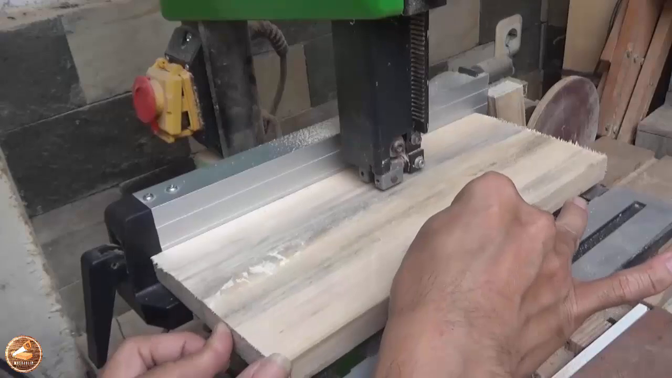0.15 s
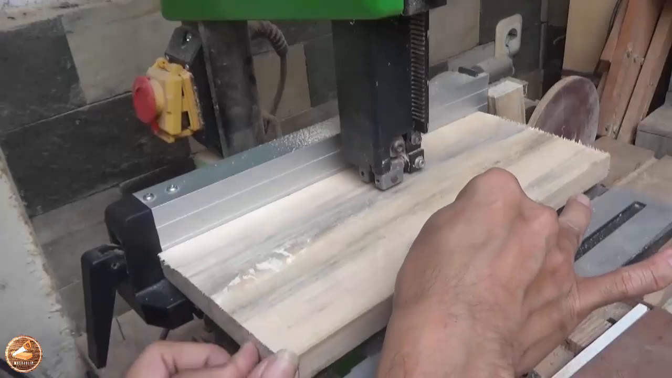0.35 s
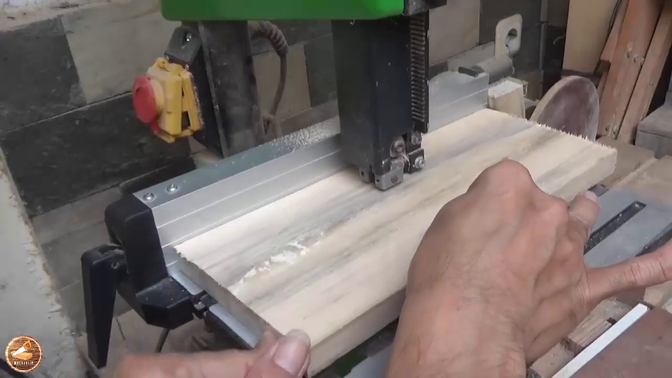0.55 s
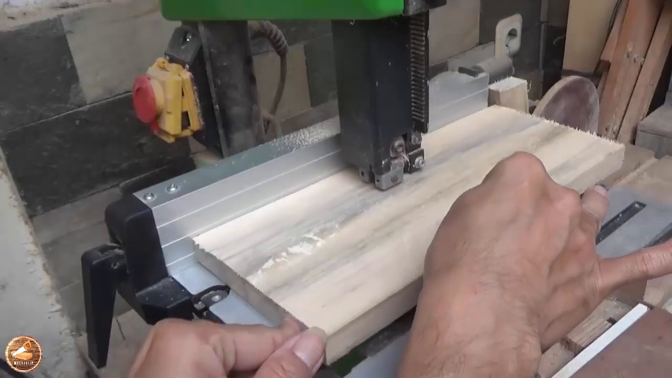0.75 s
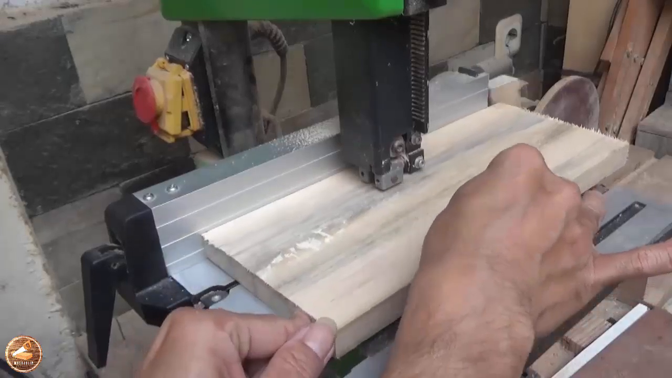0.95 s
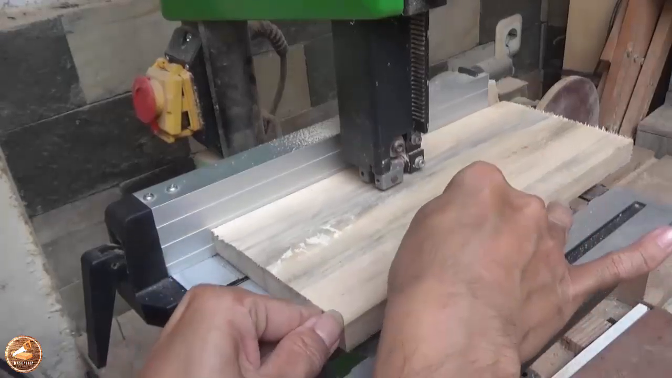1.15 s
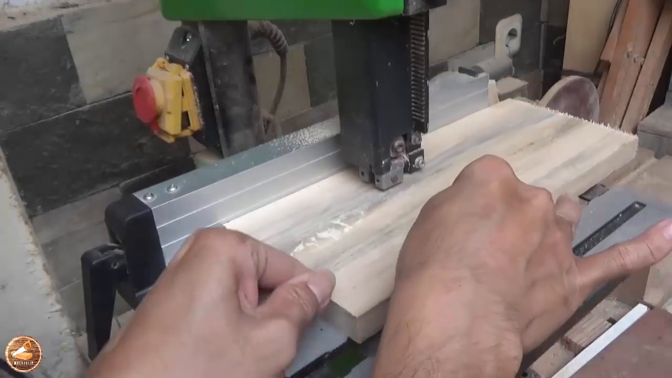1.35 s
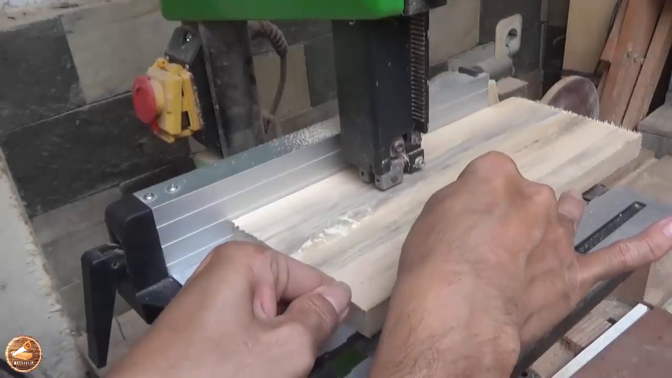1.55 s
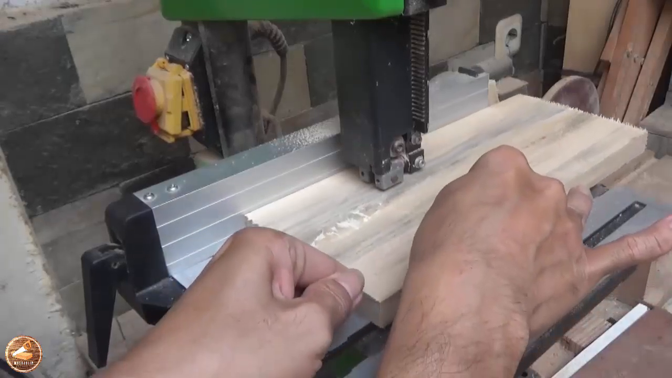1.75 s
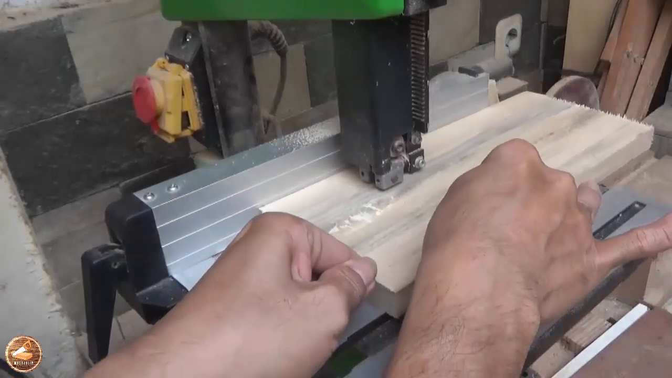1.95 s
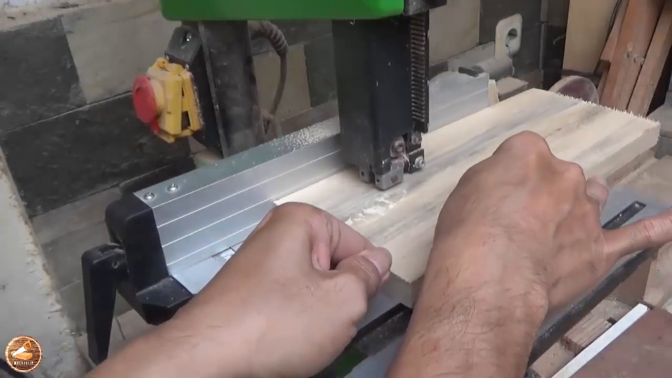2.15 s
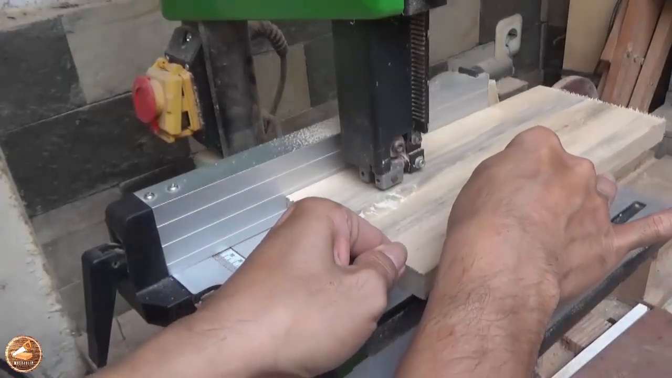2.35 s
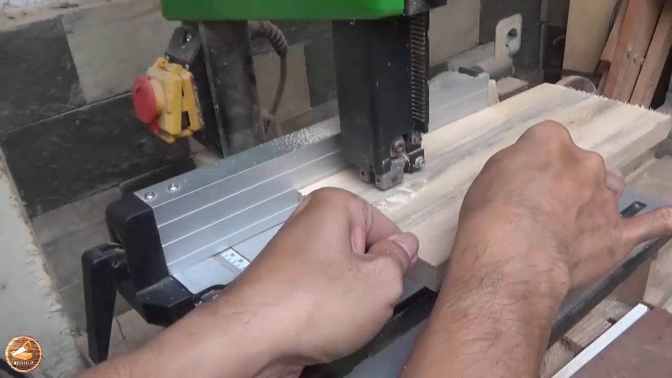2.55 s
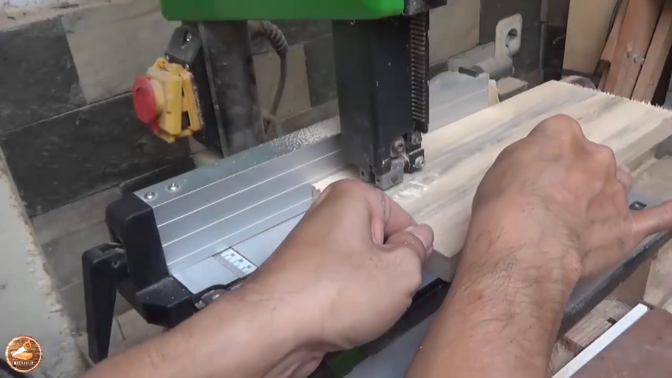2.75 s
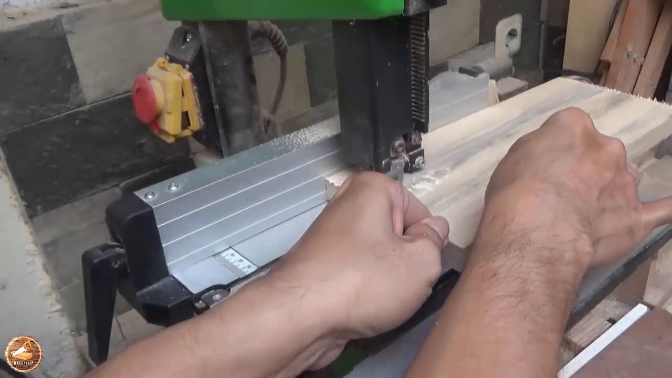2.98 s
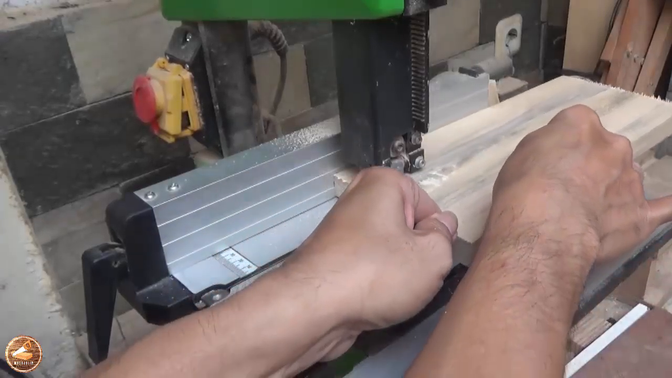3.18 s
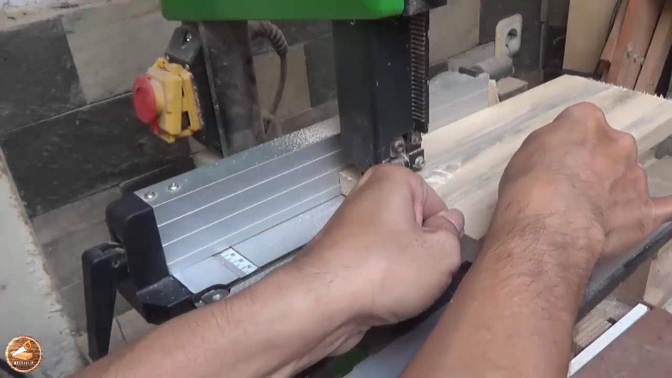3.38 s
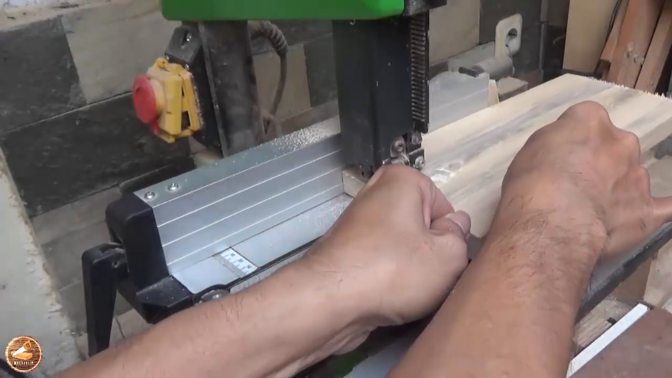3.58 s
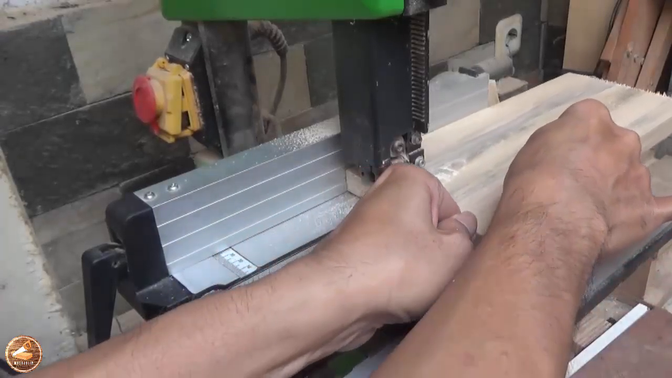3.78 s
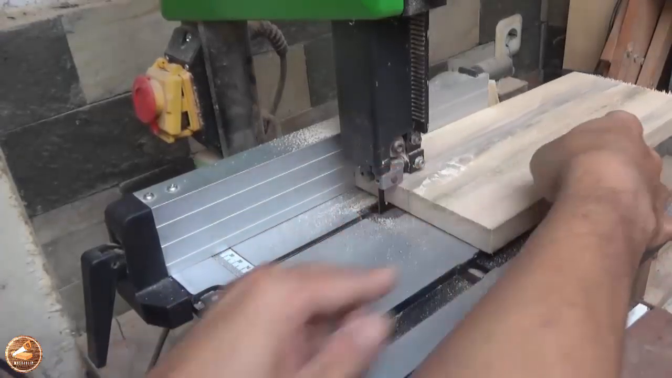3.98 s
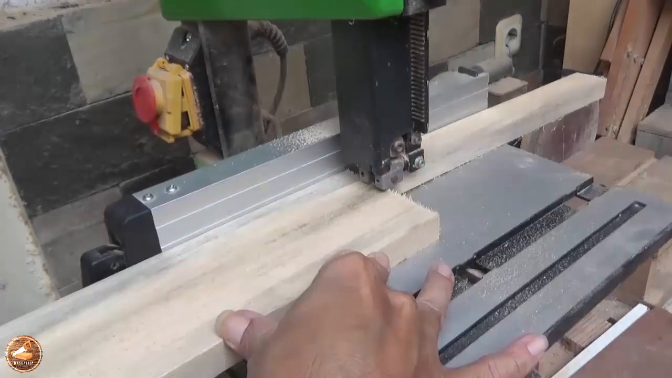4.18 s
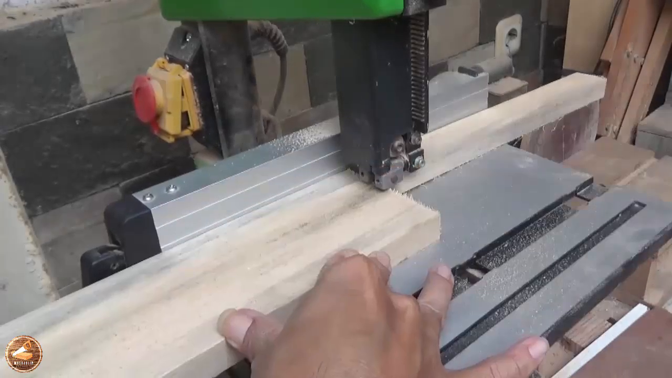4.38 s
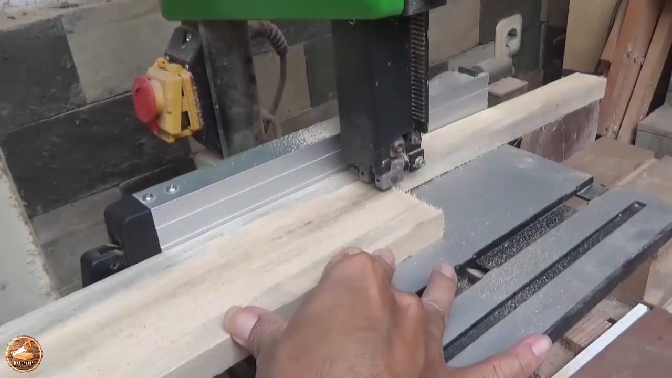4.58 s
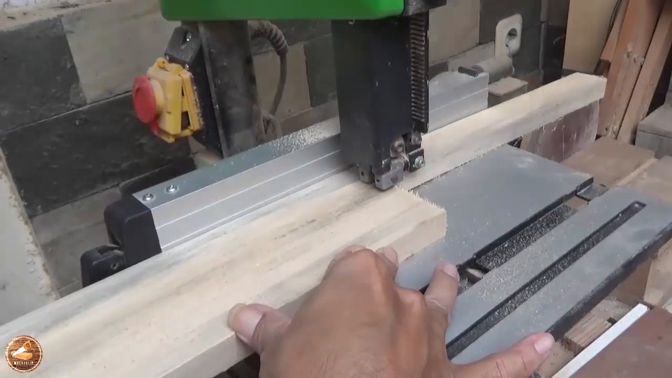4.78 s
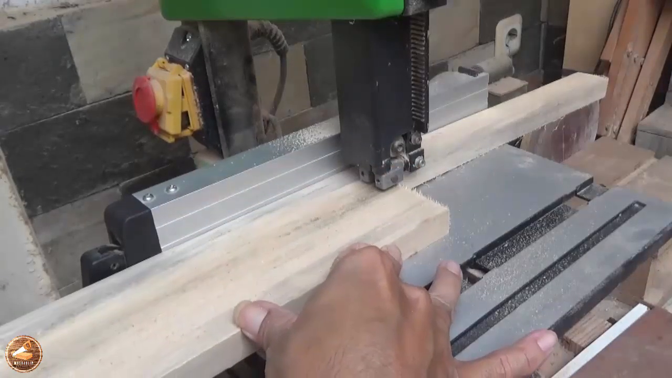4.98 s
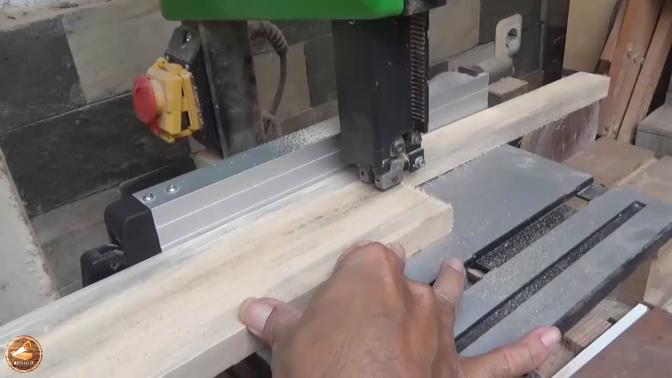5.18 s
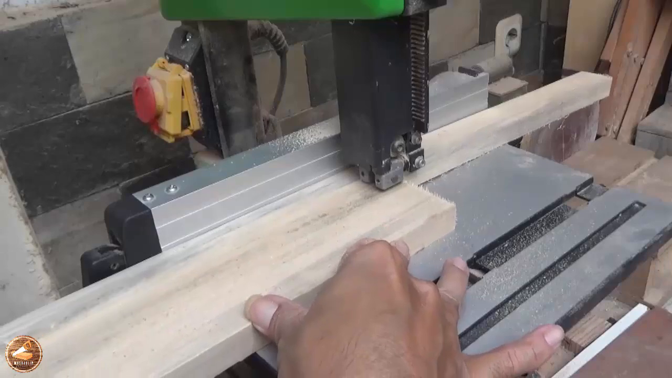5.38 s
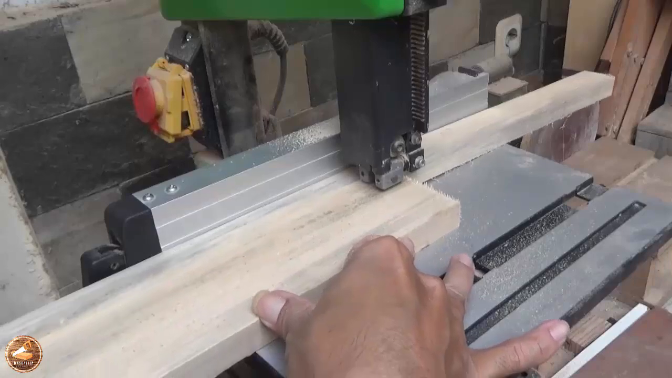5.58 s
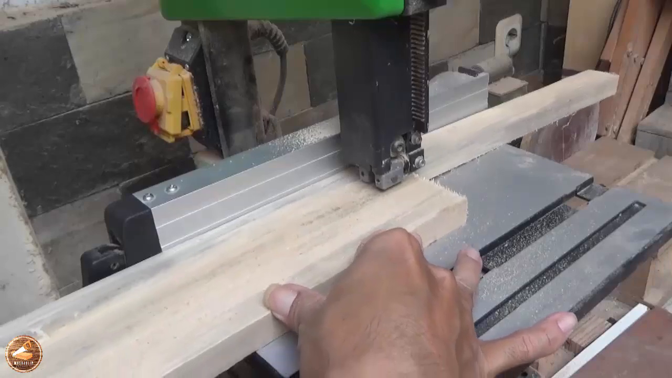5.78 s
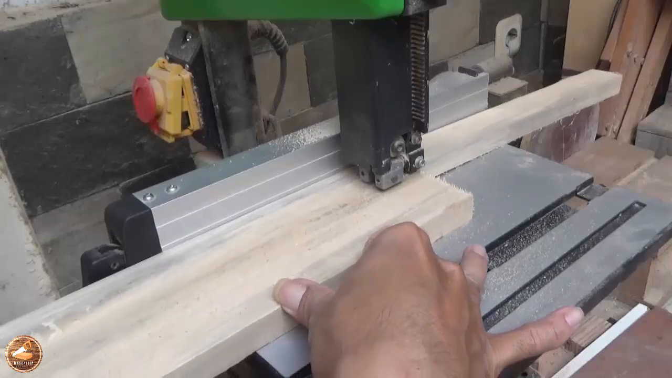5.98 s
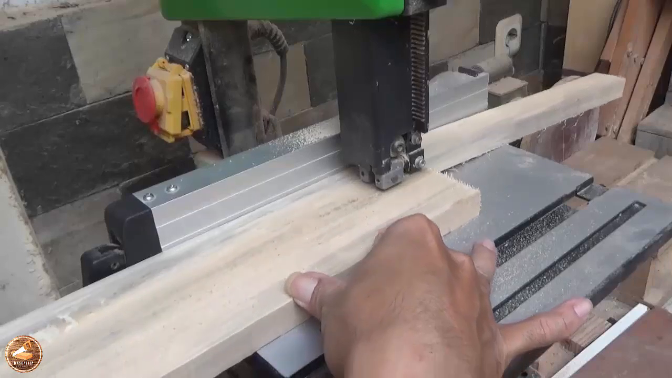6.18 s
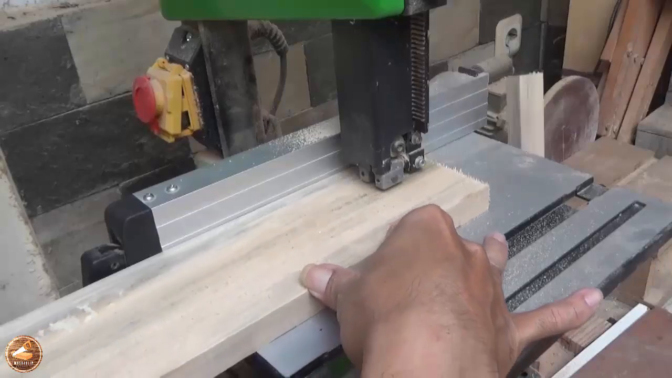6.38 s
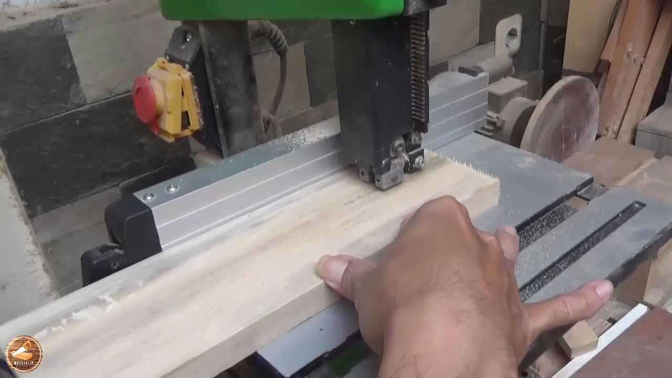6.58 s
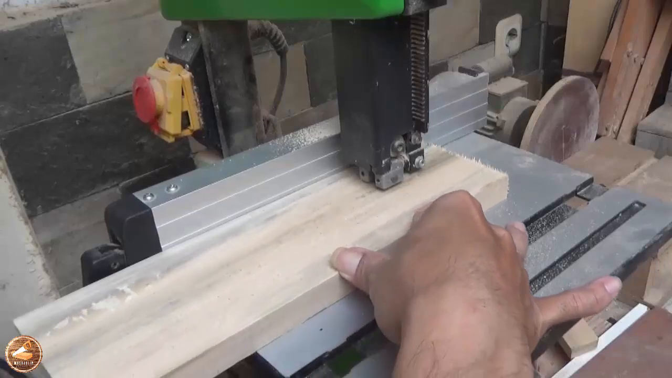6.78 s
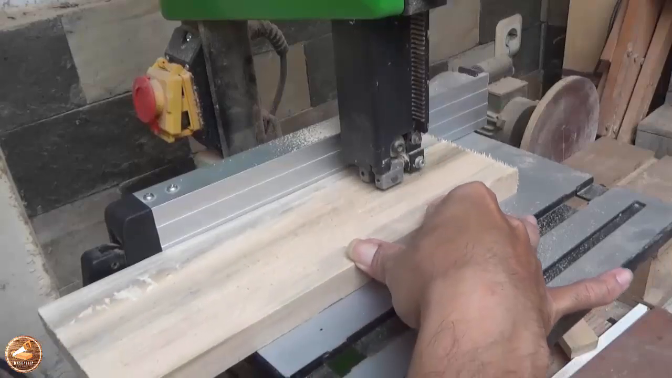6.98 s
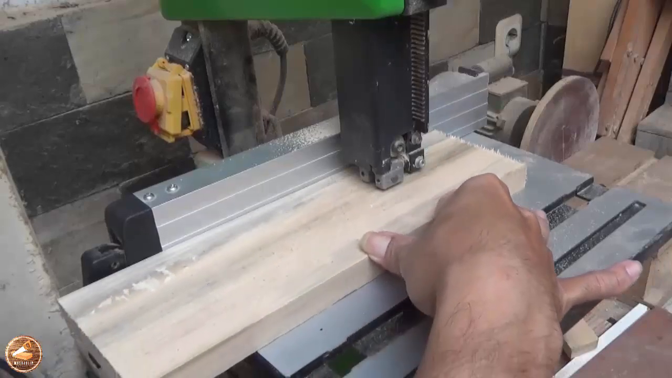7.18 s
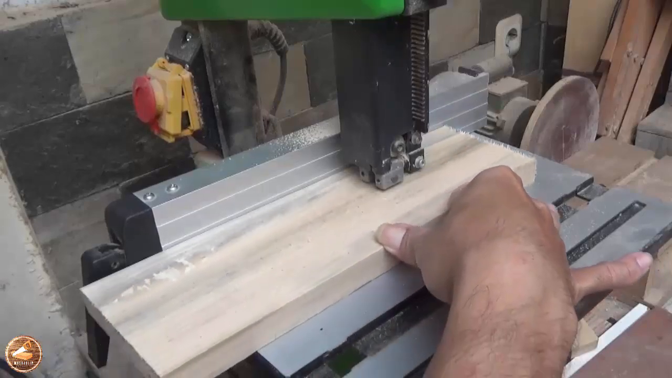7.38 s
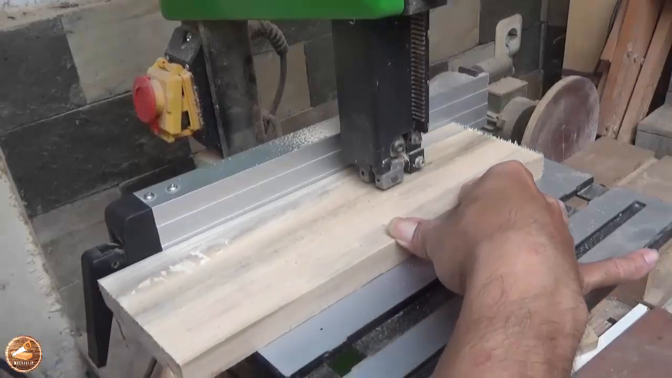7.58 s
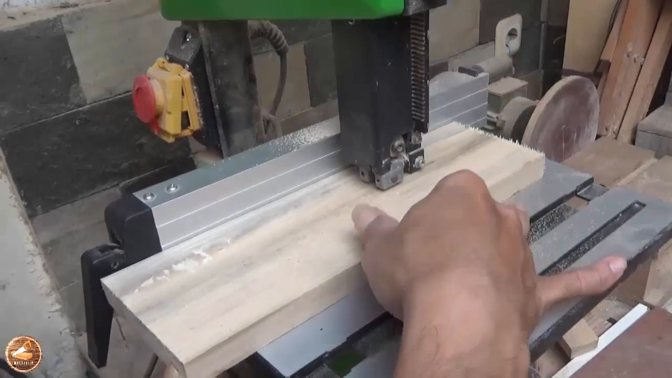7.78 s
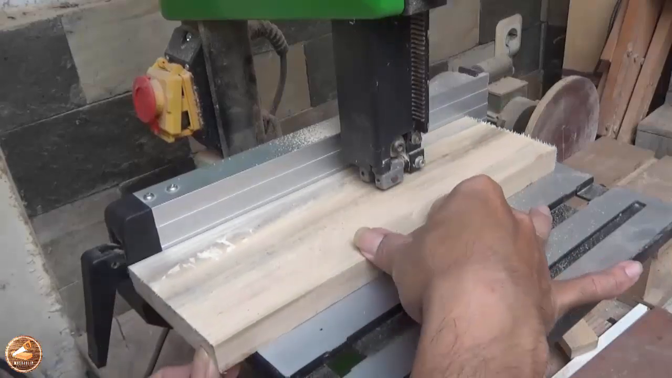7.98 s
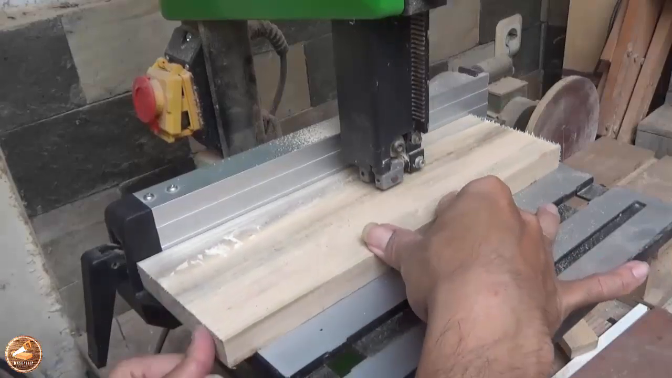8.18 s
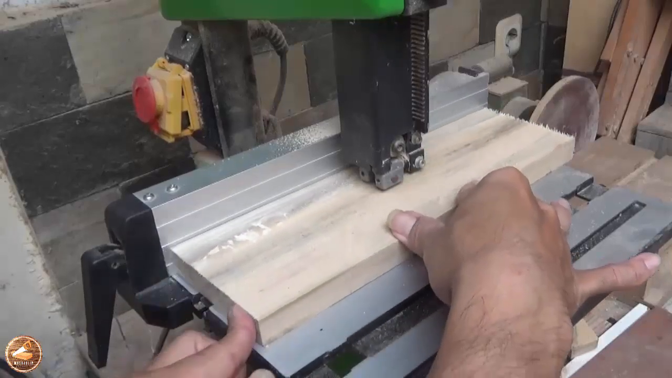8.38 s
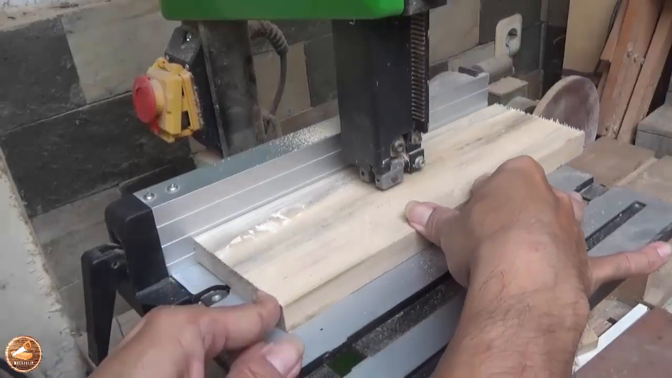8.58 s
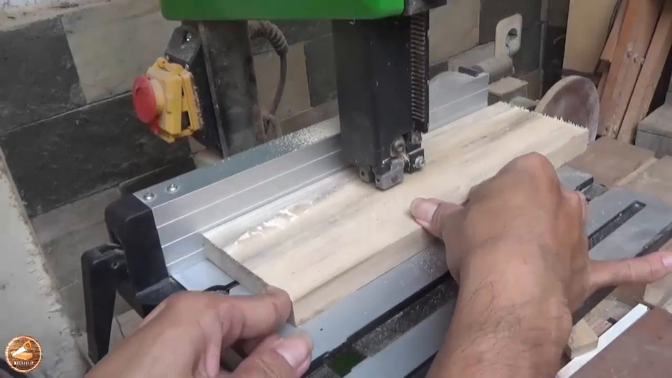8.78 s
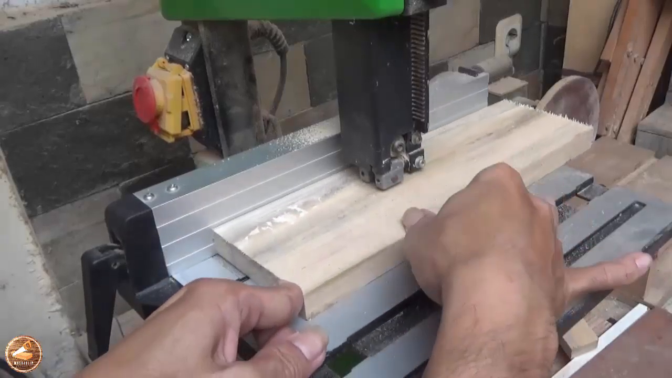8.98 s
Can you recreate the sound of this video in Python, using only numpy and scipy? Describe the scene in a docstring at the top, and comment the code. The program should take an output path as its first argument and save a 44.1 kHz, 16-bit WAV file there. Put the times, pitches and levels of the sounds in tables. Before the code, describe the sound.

A benchtop band saw is already cutting at 0 s, close up: a piercing, gritty whine around three kilohertz with higher overtones, chattering in very rapid chirps over dense, bright sawdust hiss and a faint frame drone. Brief dips come in the first quarter second, near 1 s and at 1.4 s as the hands let up, then the screech returns. From about 3.2 s the load lightens, the overtones thin and the pitch edges up; the cut ends near 3.9 s. For a third of a second the saw runs free, less hissy, with a hollow hum. At 4.2 s a second cut starts, higher, over four kilohertz, light at first, growing harsher after 5.5 s. At 6.3 s an offcut lands with a dry wooden crack and tiny bounces. Squealing continues, easing at 6.6, 7.7 and 8.1 s and surging back, still sawing at 9 s. Short workshop reflections.

```python
"""Workshop: a benchtop band saw rips two boards, running free for a moment between; the second cut sounds higher.
Tooth impacts whine as tone stacks; the loaded blade chatters in chirping bursts once per wheel turn.
Push on the board sets blade speed and chatter pitch. Sawdust hiss and frame drone are coloured noise;
blade whistles and frame hums are narrow noise and rough tones. One offcut drops, cracks and rings.
Low rumble lies below; short reflections differ between the ears."""
import sys
import numpy as np
from scipy import signal
from scipy.fft import rfft, irfft, next_fast_len
from scipy.io import wavfile
from scipy.ndimage import uniform_filter1d

SR = 44100
rng = np.random.default_rng(int(sys.argv[2]) if len(sys.argv) > 2 else 0)


def transcribe(signal):
    """Save signal, clipped to [-1, 1], as a 16-bit WAV file at the path in sys.argv[1]."""
    frames = np.atleast_2d(signal).T
    limited = np.clip(frames, -1, 1)
    pcm = np.round(limited * 32767).astype(np.int16)
    wavfile.write(sys.argv[1], SR, pcm)


def volts_from_decibels(level):
    """Turn decibel levels (scalar or array-like) into linear amplitude factors."""
    exponent = np.asarray(level, float) / 20
    return 10 ** exponent


N = 398663
TIME_S = np.arange(N) / SR

# first cut, free running, second cut: start t/s, end t/s
STAGES = [(0, 3.87), (3.87, 4.205), (4.205, 9.04)]

# push on the board per cut: t/s, pressure (1 = full load), chatter level/dB, second partial level/dB
FEED = [
    [(0.0, 1.0, -26, -27), (0.4, .75, -27.5, -30.5), (0.8, 1.1, -29, -27), (1.3, .75, -29.5, -38),
     (1.6, .95, -29, -26.5), (2.3, .8, -30, -27.5), (2.85, .92, -29, -27.5), (3.25, .55, -25.5, -29.5),
     (3.5, .28, -30.5, -53), (3.87, .12, -24.5, -46)],
    [(4.21, 0.02, -39, -45), (4.42, .25, -34.5, -45), (4.5, .33, -30.5, -52), (5.38, .45, -30, -50),
     (5.65, .9, -29, -32), (6.1, .85, -28, -31.5), (6.5, 1.0, -28.5, -29.5), (6.8, 1.05, -30.5, -30),
     (7.05, .8, -36.5, -27.5), (7.35, 0.89, -29.5, -23.5), (7.62, .7, -25, -26), (8.1, .85, -26.5, -26.5),
     (8.45, 1.0, -31, -28.5), (8.78, .55, -30.5, -32), (9.04, .85, -32.5, -30.5)],
]
# hands let up, then bite back in: start t/s, length t/s, share of pressure lost, surge scale
EASES = [(0.065, .08, .75, .02), (0.175, .14, .75, .02), (0.92, .17, .75, .1), (1.4, .09, .7, .05),
         (2.63, .04, .5, .02), (6.6, .07, .45, .02), (7.59, .03, .5, .02), (7.655, .165, .7, .8),
         (8.115, .14, .75, .8)]

# tooth whine per cut: multiples of the tooth rate
TOOTH_MULTIPLES = [(1, 1.5, 3, 4), (1, 1.5, 3, 2)]
# tooth whine per cut: t/s, level/dB of each multiple
TEETH = [
    [(0.0, -36, -48, -36, -43), (0.45, -37, -50, -33, -40), (0.75, -38, -55, -40, -36),
     (1.45, -38, -52, -34, -42), (1.9, -36, -55, -55, -42), (2.3, -33, -48, -46, -35),
     (2.95, -28, -43, -36, -41), (3.6, -39, -46, -34, -52), (3.87, -38, -52, -38, -42)],
    [(4.21, -42, -36, -49, -52), (4.7, -34, -35, -35, -45), (5.8, -32, -42, -35, -41),
     (6.9, -40, -49, -38, -47), (7.5, -35, -55, -32, -55), (8.2, -39, -48, -37, -36),
     (9.04, -39, -52, -33, -54)],
]
# tooth rate per cut, no load: rate/Hz
IDLE_TEETH_PER_S = [3640, 4950]
# loss of tooth rate per cut, full load: rate/Hz
SAG_TEETH_PER_S = [115, 160]
# whine change per cut at full ease: level/dB of each multiple
EASE_TEETH_DB = [(10, 7, 0, -8), (5, 20, -2, 0)]
TEETH_PER_WHEEL_TURN, WHEEL_TURNS_PER_BAND_LOOP = 50, 6.3

# pitch that chatter nears as the bite deepens, per cut: f/Hz
LOCK_HZ = [3112, 4200]
# nominal chatter pitch per cut, no load: f/Hz
LIGHT_HZ = [3420, 4600]
# nominal chatter pitch per cut, full load: f/Hz
PRESSED_HZ = [3160, 4190]
# chirp width factor per cut: no load, full load
CHIRP_GAIN = [(.2, 1.4), (.8, 1.0)]
# third chatter partial re second, per cut: level/dB
THIRD_RE_SECOND_DB = [-10, -5]
# chatter change per cut at full ease: fundamental level/dB, overtones level/dB
EASE_CHATTER_DB = [(-8, -28), (-24, -30)]
# chatter balance: t/s, left re right level/dB
CHATTER_SIDE = [(0.0, 2), (2.52, 1.5), (2.92, -3), (4.71, 3.5), (5.51, 4), (6.19, -0.5), (9.04, 1.5)]

# load noise per stage: t/s, sawdust hiss level/dB, frame drone level/dB
LOAD = [
    [(0.0, -27, -39), (1.14, -26, -35.5), (3.16, -26, -34), (3.8, -26.5, -35), (3.87, -30, -29)],
    [(3.87, -35, -32.5), (3.97, -35.5, -28), (4.205, -30, -28)],
    [(4.21, -26.5, -30.5), (4.49, -28, -36), (5.12, -28.5, -40), (6.3, -29, -37.5), (6.5, -31, -37.5),
     (7.8, -28, -38), (9.04, -29, -35)],
]
# sawdust hiss spectrum per stage: f/Hz, relative density level/dB
HISS = [
    [(1500, -24), (2600, -8), (3050, -10), (3500, 0), (3900, -3), (4250, -7), (4600, -1), (5700, -3),
     (6500, -2), (7900, -5), (10300, -2), (12500, -6), (14000, -1), (15000, -5), (16000, -9)],
    [(1500, -32), (2600, -5), (4000, -7), (4450, -13), (5600, -8), (9400, -13), (11300, -5), (12200, -13),
     (14300, -12), (15500, -16), (16000, -20)],
    [(1500, -25), (2900, -12), (3600, 0), (4100, -11), (4750, 0), (5100, -2), (5600, -6), (7000, -2),
     (7800, -3), (9200, 0), (10400, 0), (11500, -3), (13600, -1), (15300, -1), (16000, -6)],
]
# blade resonances and hollows per stage: f/Hz, width f/Hz, level re hiss/dB
BLADE = [
    [(4540, 52, 7), (5400, 39, -8.5), (8650, 160, 2.5), (12300, 790, 0)],
    [],
    [(3700, 170, 4), (5460, 170, 5.5), (10640, 91, -3), (10370, 3600, 0.5), (11840, 150, -1)],
]
# frame drone spectrum per stage: f/Hz, relative density level/dB
DRONE = [
    [(120, -37), (200, -25.5), (512, -22), (594, -22), (744, -19), (1030, -1), (1400, -14.5), (1650, -5),
     (2180, -18.5), (3000, -6.5), (3900, -43), (6600, -120)],
    [(120, -59), (200, -31), (369, -24), (635, -30), (1030, 1), (1400, -17), (1650, -8.5), (2390, -14),
     (3000, -13), (3900, -43), (6600, -120)],
    [(120, -57), (200, -31.5), (530, -20.5), (574, -24.5), (720, -22), (1010, -19.5), (1280, -5),
     (1840, -16.5), (2180, -10), (3000, -15.5), (3900, -34), (6600, -120)],
]
# frame resonances per stage: f/Hz, width f/Hz, level re drone/dB
FRAME = [
    [(423, 14, 7), (525, 19, -0.5), (926, 7.7, 10), (1025, 9.2, 8), (1074, 5.4, 13.5), (1247, 12, 8.5),
     (1515, 17, 9), (1705, 13, 12.5), (1847, 20, 6)],
    [(976, 55, 2.5), (975, 28, 0), (1610, 59, 6.5), (2300, 60, 11)],
    [(526, 6.8, -17), (572, 9, 11), (1160, 6.4, 9), (1291, 20, 7), (1390, 13, 10.5), (1440, 16, 10.5),
     (1665, 120, 6), (2008, 9.6, 10.5), (2170, 14, 9.5)],
]

# rough whistles of the free blade span: peak t/s, swell t/s, fade t/s, f/Hz, peak level/dB
WHISTLES = [(0.5, .45, 0.25, 6950, -30.5), (0.82, 0.36, .45, 13740, -31.5), (2.2, 0.97, 0.48, 13700, -33),
            (3.66, 0.64, 0.31, 6795, -29), (3.75, 1.2, 0.45, 14700, -30), (3.84, 1.2, .3, 11300, -34),
            (5.4, 1.8, 0.7, 12330, -31), (7.76, 0.44, 0.12, 9980, -28), (8.25, 0.55, 0.18, 9600, -27.5)]
# passing frame hums: peak t/s, swell t/s, fade t/s, f/Hz, peak level/dB
HUMS = [(1.8, 3.5, 2.9, 924, -50), (3.0, 2.2, 1.1, 1021, -45), (3.75, 1.2, .2, 513, -54),
        (4.0, .09, 0.12, 2450, -31.5), (6.6, 2.5, 5.1, 1293, -43.5), (8.2, 1.2, .3, 575, -61)]

# offcut landing: t/s, reference level/dB
DROP = [(6.316, -24)]
# offcut modes: f/Hz, relative level/dB, t60 t/s
OFFCUT = [(1470, -21, .03), (1870, -2, 0.061), (2265, 7, 0.094), (2570, 4, 0.053), (3040, 2, 0.055),
          (3500, 2, .03), (3800, -10, .02)]

# reflections that differ between the ears: f/Hz, level re direct/dB
WALLS = [(60, -13), (110, -15), (200, -15), (380, -15), (700, -19.5), (1290, -23), (2380, -14.5),
         (4400, -11), (8120, -13.5), (15000, -13.5)]


def rms_one(x):
    """Scale to unit rms."""
    return x / np.sqrt(np.mean(x ** 2) + 1e-20)


def in_time(rows):
    """Columns as curves, behind a gate open only while the rows last."""
    s, *columns = np.transpose(rows)
    gate = np.clip(np.minimum(TIME_S - s[0] + .004, s[-1] - TIME_S + .004) / .008, 0, 1)
    return gate, *[np.interp(TIME_S, s, c) for c in columns]


def at_hz(points, hz):
    """Read a spectrum on a log-frequency axis."""
    point_hz, db = np.transpose(points)
    return np.interp(np.log(hz + 1), np.log(point_hz), db)


def drift(corner_hz, size=N):
    """Slow chance: noise through a double one-pole low-pass at SR / 8, unit rms."""
    r = np.exp(-16 * np.pi * corner_hz / SR)
    noise = rng.standard_normal(N // 8 + 4002)
    slow = rms_one(signal.lfilter([1], [1, -2 * r, r * r], noise)[4000:])   # settled part
    return np.interp(np.arange(size) / 8, np.arange(len(slow)), slow)


def turns(hz):
    """Running phase/rad of a frequency curve."""
    return 2 * np.pi * np.cumsum(hz) / SR


def throb(wheel, once, twice):
    """Level swing once and twice per wheel turn, unit rms."""
    return rms_one(np.exp(once * np.cos(wheel) + twice * np.cos(2 * wheel)))


def rough_tone(phase, rough, corner_hz):
    """Unit-rms sine with a share of its power smeared into narrow noise around it."""
    sine = np.sin(phase)
    smear = drift(corner_hz, size=len(phase)) * np.cos(phase) + drift(corner_hz, size=len(phase)) * sine
    return np.sqrt(2 * (1 - rough)) * sine + np.sqrt(rough) * smear


def hands():
    """How far the hands have let up (0-1), and the dying surge as they bite back in."""
    edge_s, surge_rise_s, surge_decay_s = .02, .07, .15
    ease, surge = 0, 0
    for start, length, lost, after in EASES:
        inside = np.minimum(TIME_S - start, start + length - TIME_S)
        ease = ease + lost * np.clip(inside / edge_s + .5, 0, 1)
        since = np.clip(TIME_S - start - length, 0, None)
        surge = surge + after * np.minimum(since / surge_rise_s, 1) * np.exp(-since / surge_decay_s)
    return np.clip(ease, 0, 1), surge


def chatter(cut, gate, pressure, ease, levels_db, wheel, loop_share):
    """The loaded blade slips in chirping bursts, one per wheel turn; deeper bite: louder, nearer lock pitch."""
    lock_hz, light = LOCK_HZ[cut], 1 - np.clip(pressure, 0, 1)
    nominal_hz = PRESSED_HZ[cut] + (LIGHT_HZ[cut] - PRESSED_HZ[cut]) * light
    first_db, second_db = [db + ease_db * ease for db, ease_db in zip(levels_db, EASE_CHATTER_DB[cut])]
    third_db = second_db + THIRD_RE_SECOND_DB[cut]

    # the weld comes round once per band loop
    loop = np.exp(1.5 * np.cos(wheel / WHEEL_TURNS_PER_BAND_LOOP + drift(3.5)))
    bite = loop_share * rms_one(loop - loop.mean()) + .25 * drift(30)
    slack_hz = (nominal_hz - lock_hz) * 2 / (1 + np.exp(1.2 * bite))

    loose, loaded = CHIRP_GAIN[cut]
    wobble = .016 * np.sin(wheel + .4 * drift(8)) + .009 * drift(150) + .003 * drift(12)
    chirp_hz = lock_hz * (loaded + (loose - loaded) * light) * wobble

    # order, level/dB, throb depth, share of slack, rough share; overtones stay nearer lock pitch
    partials = ((1, first_db, .18, 1, .38), (2, second_db, .3, .3, .2), (3, third_db, .25, .2, .8))
    out = 0
    for order, db, depth, cling, rough in partials:
        bursts = throb(wheel + .5 * drift(3.2), depth, .077)
        uneven = rms_one(volts_from_decibels(1.7 * bite + 1.6 * drift(120)) * bursts)
        phase = order * turns(lock_hz + cling * slack_hz + chirp_hz)
        out = out + volts_from_decibels(db) * uneven * rough_tone(phase, rough, 150)
    return gate * out


def teeth(cut, gate, pressure, ease):
    """Tooth impacts: thin wavering stack, side lines from wheel run-out. Returns wheel phase too."""
    motor_lag_s = .025
    keep = np.exp(-1 / (motor_lag_s * SR))
    load = signal.lfilter([1 - keep], [1, -keep], pressure, zi=[keep * pressure[0]])[0]
    teeth_per_s = IDLE_TEETH_PER_S[cut] - SAG_TEETH_PER_S[cut] * load
    phase = turns(teeth_per_s * (1 + .002 * drift(40)))
    wheel = phase / TEETH_PER_WHEEL_TURN
    out = 0
    for multiple, db, ease_db in zip(TOOTH_MULTIPLES[cut], in_time(TEETH[cut])[1:], EASE_TEETH_DB[cut]):
        flutter = rms_one(volts_from_decibels(2.2 * drift(25)) * throb(wheel, .25, .08 * multiple))
        out = out + volts_from_decibels(db + ease_db * ease) * flutter * rough_tone(multiple * phase, .2, 60)
    return gate * out, gate * wheel


def staged_noise(spectra, resonances, low_hz, high_hz):
    """Noise coloured anew in each stage, rms 1 between low and high."""
    size = next_fast_len(N, True)
    out, hz = np.zeros(N), np.fft.rfftfreq(size, 1 / SR)
    white = rfft(rng.standard_normal(size))
    for span, spectrum, peaks in zip(STAGES, spectra, resonances):
        peaks_db = sum(db / (1 + (2 * (hz - centre) / width) ** 2) for centre, width, db in peaks)
        gain = volts_from_decibels(at_hz(spectrum, hz) + peaks_db)
        power = 2 * np.sum(gain[(hz > low_hz) & (hz < high_hz)] ** 2) / size
        gate = in_time([[t] for t in span])[0]
        out += gate * irfft(white * gain, size)[:N] / np.sqrt(power)
    return out


def patchy(x, quick_db, slow_db):
    """Neighbouring pitches swell and fade together by chance, some quickly, some slowly."""
    spectrum = signal.stft(x, nperseg=512)[2]
    field = uniform_filter1d(rng.standard_normal(spectrum.shape), size=9, axis=0)
    quick = rms_one(uniform_filter1d(field, size=7, axis=1))
    slow = rms_one(uniform_filter1d(field[::-1], size=150, axis=1))
    return signal.istft(spectrum * volts_from_decibels(quick_db * quick + slow_db * slow), nperseg=512)[1][:N]


def sawdust_hiss(hiss_db, ease, wheel):
    """Sawdust: patchy noise coloured by blade resonances, throbbing with the wheel."""
    noise = patchy(staged_noise(HISS, BLADE, 3000, 15800), quick_db=1.11, slow_db=2.52)
    return volts_from_decibels(hiss_db - 1.5 * ease) * throb(wheel, .05, .069) * noise


def swells(rows, rough, width_share):
    """Tones smeared in proportion to pitch, 15 dB down one swell before or one fade after the peak."""
    out = np.zeros(N)
    for peak, swell, fade, hz, db in rows:
        heard = (TIME_S > peak - 3 * swell) & (TIME_S < peak + 3 * fade)
        t = TIME_S[heard]
        away = np.maximum((peak - t) / swell, (t - peak) / fade)
        out[heard] += volts_from_decibels(db - 15 * away) * rough_tone(2 * np.pi * hz * t, rough, width_share * hz)
    return out


def blade_whistles(cutting):
    """Free blade span: narrow noise, heard only during cuts."""
    return cutting * swells(WHISTLES, rough=1, width_share=.025)


def offcut():
    """A wooden strip lands and bounces, cracking and ringing its modes."""
    crack_db, crack_decay_s, contact_s = -3, .0026, .001
    size = SR // 2
    out = np.zeros(N)
    for s, db in DROP:
        start = int(s * SR)
        for lag_s, bounce_db in ((0, 1), (.014, -6), (.024, -9)):
            age = np.clip(TIME_S[:size] - lag_s, 0, None)
            burst = np.diff(rng.standard_normal(size + 3), 3) * (age > 0) * np.exp(-age / crack_decay_s)
            crack = rms_one(signal.lfilter([1], [1, -1.6, .75], burst)) * np.sqrt(crack_decay_s)
            out[start:start + size] += volts_from_decibels(db + bounce_db + crack_db) * crack
            for hz, mode_db, t60_s in OFFCUT:
                ring_db = db + bounce_db + mode_db - 6 + rng.normal(0, 2.7) - 60 * age / t60_s
                ring = volts_from_decibels(ring_db) * np.sin(2 * np.pi * hz * age)
                out[start:start + size] += ring * np.minimum(age / contact_s, 1)
    return out


def frame_drone(drone_db, ease):
    """Frame: patchy noise coloured by its resonances, rising as the hands let up."""
    noise = patchy(staged_noise(DRONE, FRAME, 700, 2800), quick_db=.93, slow_db=1.87)
    return volts_from_decibels(drone_db + 3.5 * ease) * noise


def frame_hums():
    """Frame: slightly rough tones that swell and fade."""
    return swells(HUMS, rough=.25, width_share=.011)


def shop_rumble():
    """Steady noise low-passed at 300 Hz."""
    low_pass = signal.butter(2, 300, fs=SR, output="sos")
    return volts_from_decibels(-59.5) * rms_one(signal.sosfilt(low_pass, rng.standard_normal(N)))


def shop_reflections(x):
    """A dying scatter of reflections, opposite in the two ears."""
    t60_s, tail_size = .12, SR // 4
    tail = rng.standard_normal(tail_size) * volts_from_decibels(-60 * np.arange(tail_size) / SR / t60_s)
    size = next_fast_len(N + tail_size)
    scatter = rfft(tail, size)
    scatter = scatter / np.sqrt(uniform_filter1d(abs(scatter) ** 2, size=601))   # no band favoured by chance
    colour = volts_from_decibels(at_hz(WALLS, np.fft.rfftfreq(size, 1 / SR)))
    return irfft(rfft(x, size) * scatter * colour, size)[:N] * [[1], [-1]]


def scene():
    """Saw, boards and shop, in stereo."""
    ease, surge = hands()
    whine, blade, wheel, cutting = 0, 0, 0, 0
    for cut, loop_share in enumerate((.155, .55)):
        gate, feed, *levels_db = in_time(FEED[cut])
        pressure = feed * (1 - ease) + surge
        cut_whine, cut_wheel = teeth(cut, gate, pressure, ease)
        blade = blade + chatter(cut, gate, pressure, ease, levels_db, cut_wheel, loop_share)
        whine, wheel, cutting = whine + cut_whine, wheel + cut_wheel, cutting + gate
    hiss_db, drone_db = in_time(np.vstack(LOAD))[1:]
    side_db = in_time(CHATTER_SIDE)[1]
    direct = blade * volts_from_decibels(np.array([side_db, -side_db]) / 2) + whine
    direct = direct + sawdust_hiss(hiss_db, ease, wheel) + blade_whistles(cutting) + offcut()
    direct = direct + frame_drone(drone_db, ease) + frame_hums() + shop_rumble()
    return direct + shop_reflections(direct.mean(axis=0))


def top_cut(x):
    """Nothing passes above the cut-off."""
    return signal.sosfilt(signal.butter(12, 16110, fs=SR, output="sos"), x)


def record(dry):
    """Records the finished mix."""
    return top_cut(dry)


dry = scene()
out = record(dry)
transcribe(out)
```